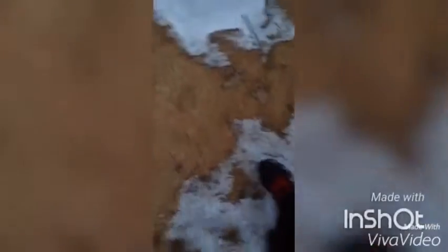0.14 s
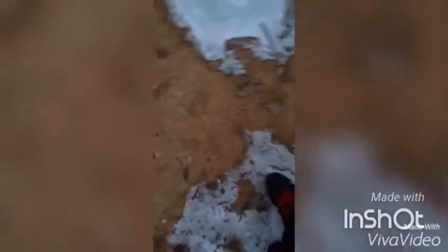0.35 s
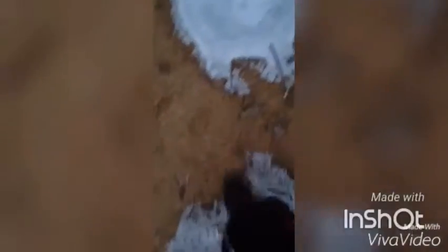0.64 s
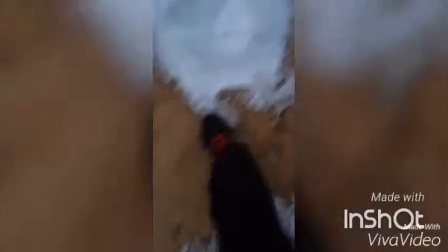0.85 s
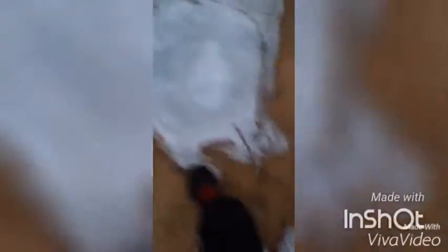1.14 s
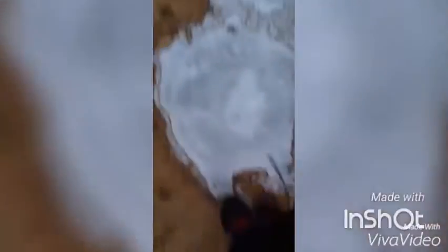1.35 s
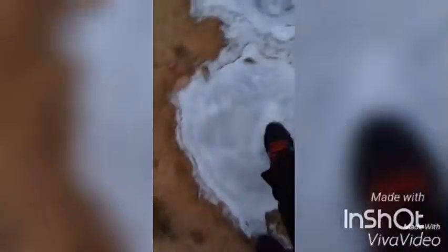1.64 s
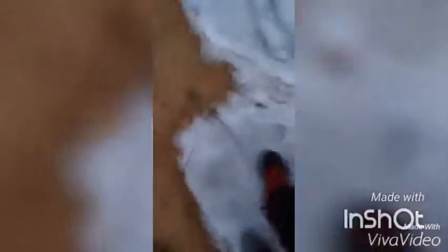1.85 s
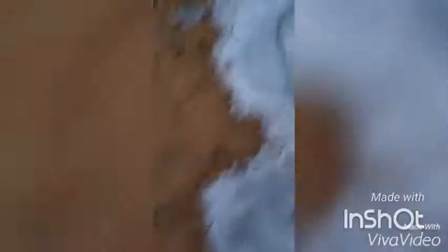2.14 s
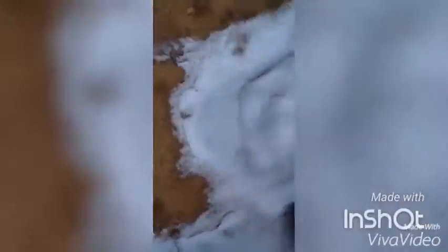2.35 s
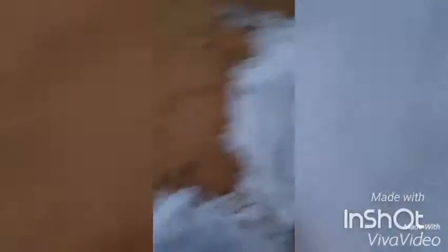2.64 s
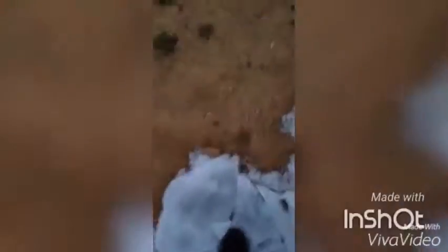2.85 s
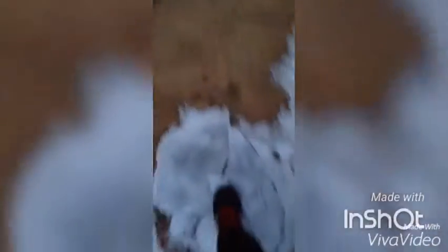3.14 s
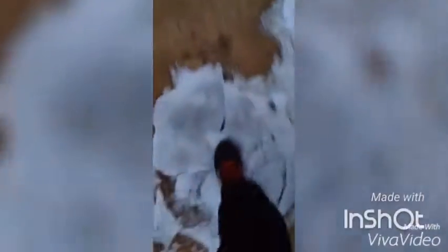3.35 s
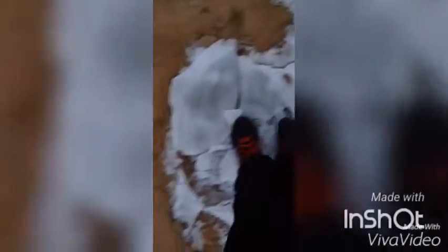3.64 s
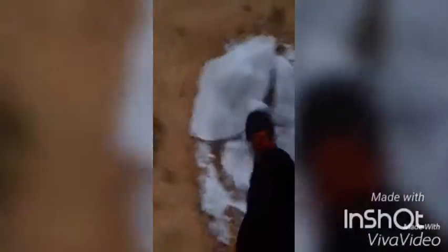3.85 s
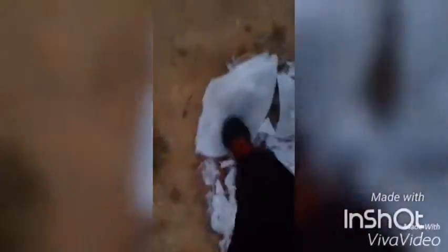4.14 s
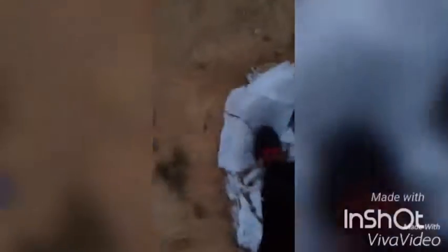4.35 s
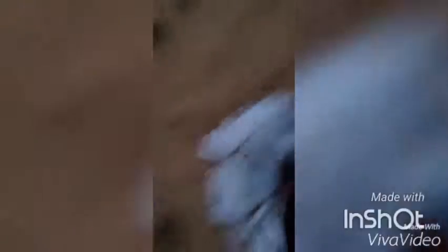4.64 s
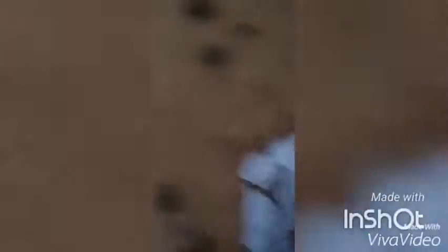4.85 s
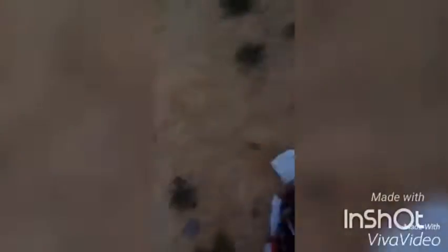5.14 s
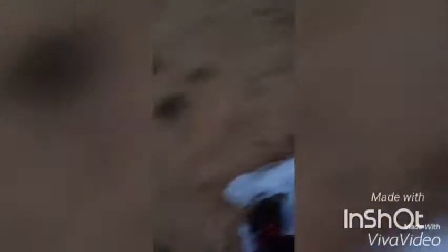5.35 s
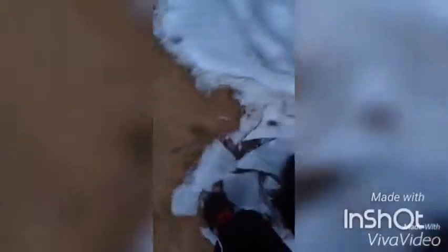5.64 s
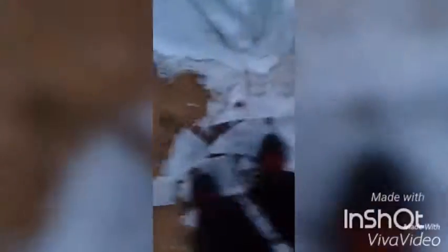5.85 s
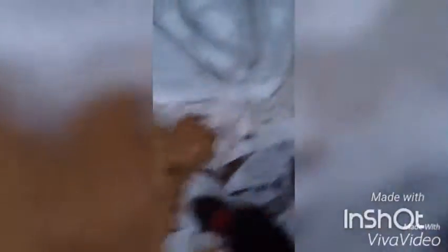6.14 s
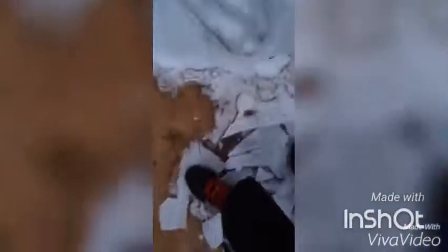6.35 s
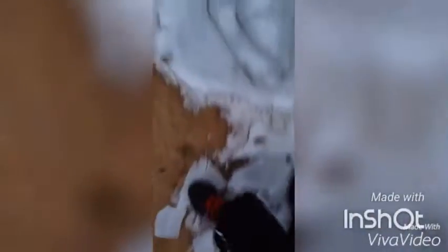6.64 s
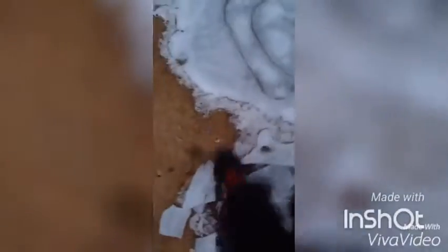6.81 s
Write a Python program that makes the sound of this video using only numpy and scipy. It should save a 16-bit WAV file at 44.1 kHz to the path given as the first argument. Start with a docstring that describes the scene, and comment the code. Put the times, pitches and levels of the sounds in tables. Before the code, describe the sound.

Close to the microphone outdoors, shoes break a brittle crust of ice. A few sharp cracks come in the first second or so, then a short near-quiet gap, then a loud burst of crunching. From there, snaps, glassy splinters and hollow slab knocks follow irregularly almost to the end, with low thuds and rumble from shifting weight. A faint steady hush lies beneath.

```python
"""Brittle ice crust snaps and crunches under shoes, close by, over a faint outdoor hush.
Cracks are bursts of noise that ring a shard and a hollow slab, each as damped modes.
Splinters are filtered noise puffs and ringing shards; broken slabs are modes tapped by sparse clicks.
Low pushes make the thuds, irregular slips the scrapes, and lumpy low noise the rumble.
"""
import sys
import numpy as np
from scipy import signal
from scipy.io import wavfile
from scipy.ndimage import uniform_filter1d

SR = 44100
rng = np.random.default_rng(int(sys.argv[2]) if len(sys.argv) > 2 else 0)


def store_pcm(level_fs):
    """Save levels as 16-bit WAV."""
    pcm = np.round(np.clip(level_fs, -1, 1) * 32767).astype(np.int16)
    wavfile.write(sys.argv[1], SR, np.atleast_2d(pcm).T)


N = 307818  # length in samples

# Spectrum of splintering ice: frequency_hz, relative_level_db
SPLINTER_SPECTRUM = [(590, -30.5), (1000, -11), (1390, -8), (2120, -3.5), (2940, -7), (3510, -1.5),
                     (7730, -6), (9600, -7.5), (9990, -16.5), (10600, -50.5), (13800, -55.5), (22000, -120)]
# The sole grinds down; slab level is the power sum of all plates before their high-pass:
# full_at_s, rise_s, hold_s, splinter_level_db, splinter_and_slab_drift_over_hold_db,
# slab_level_db, slab_tilt_db_per_octave (positive favours small plates)
GRINDS = [(0.157, 0.044, 0.03, -65, 8, -54, -25), (0.207, .02, 0.043, -44, -1.5, -52, 4),
          (0.293, 0.056, .005, -34.5, -1.5, -37, -6), (0.45, 0.024, 0.19, -53.5, -2, -60.5, 0),
          (0.669, 0.14, 0.016, -41.5, 2, -52, 3), (0.845, 0.078, .1, -60, -3, -72, 4),
          (1.075, 0.054, 0.2, -45, -21, -47, 5), (1.373, 0.17, .005, -48.5, 0.5, -50.5, 15),
          (1.497, 0.094, 0.13, -55.5, -12, -61, -3), (1.884, 0.0094, 0.24, -18.5, -1.5, -22, -1),
          (2.271, 0.35, 0.0049, -19, -5.5, -26, -4.5), (2.424, 0.25, .06, -43, 1, -54, -4),
          (2.546, 0.084, 0.013, -23.5, -1, -31.5, 1), (2.587, .05, 0.22, -29.5, 5, -35.5, -1),
          (2.857, 0.11, 0.012, -37.5, 3.5, -43.5, 5), (3.047, 0.064, 0.015, -51, 4.5, -29.5, -22),
          (3.156, 0.11, 0.088, -37.5, 1.5, -40, -2), (3.292, 0.06, .02, -50, -0.5, -58, 3),
          (3.384, 0.075, 0.081, -43, -15, -44, 2), (3.607, 0.17, 0.072, -31, 6, -29, 1.5),
          (3.703, 0.047, 0.0035, -34, -6, -21.5, -8), (3.843, 0.046, 0.0041, -43.5, 0.5, -46, 0),
          (3.921, .03, 0.11, -35.5, 7.5, -32, 6.5), (4.051, 0.051, .16, -27.5, -2.5, -30, 0),
          (4.248, 0.054, 0.11, -42, -4.5, -50, 1), (4.444, 0.11, 0.13, -26.5, -8.5, -31, 6),
          (4.609, 0.17, 0.0044, -26, 2.5, -24.5, 16), (4.686, .05, 0.086, -36.5, -7, -43, 8),
          (4.888, 0.21, 0.0065, -27.5, -3, -30, 5), (4.95, 0.073, 0.11, -44.5, 8.5, -45.5, 9),
          (5.142, 0.11, 0.14, -28, -9, -32, 5), (5.272, 0.022, 0.0022, -12.5, -6, -21, 16),
          (5.391, 0.051, .003, -30.5, -2, -41, 19), (5.536, 0.43, 0.0086, -45.5, 4, -60, 1),
          (5.723, 0.22, 0.052, -50.5, -1, -74, -5), (5.847, 0.12, 0.051, -36.5, 9, -42, -4),
          (6.106, 0.11, 0.12, -36.5, -5.5, -37, 9.5), (6.303, 0.11, 0.088, -37, 9.5, -39.5, 5.5),
          (6.437, 0.12, 0.0046, -25.5, -2, -30.5, 13), (6.643, 0.18, .003, -37, -7.5, -42.5, 11),
          (6.873, 0.24, 0.0055, -40, 1, -36.5, -2.5), (6.975, 0.035, .01, -30.5, -8, -66, 8)]
CONTROL_S = np.arange(0, N + 64, 64) / SR  # coarse time grid for slow levels


def gain_of(db):
    """Decibel law: 20 dB is a factor of ten in amplitude."""
    return 10 ** (np.asarray(db) / 20)


def evened(x):
    """Normalization to unit rms amplitude."""
    return x / np.sqrt(np.mean(x ** 2) + 1e-20)


def peaked(x):
    """Normalization to unit peak amplitude."""
    return x / (abs(x).max() + 1e-20)


def add(mix, start_s, sound):
    """Superposition: a sound adds to the mix in place, cut at its end."""
    part = mix[round(start_s * SR):][:len(sound)]
    part += sound[:len(part)]


def colour(x, spectrum):
    """Minimum-phase filtering: the response is causal, so clicks stay sharp in front."""
    point_hz, point_db = np.transpose(spectrum)
    bin_hz = abs(np.fft.fftfreq(8192, 1 / SR))
    bin_db = np.interp(np.log(bin_hz + 1), np.log(point_hz + 1), point_db)
    log_gain = np.log(gain_of(np.maximum(bin_db, -80)))
    # The Hilbert transform of the log gain supplies the minimum phase.
    response = np.exp(np.conj(signal.hilbert(log_gain)))
    taps = np.fft.ifft(response).real[:4096]
    taps = taps.reshape((1,) * (x.ndim - 1) + (-1,))
    return signal.oaconvolve(x, taps, axes=-1)[..., :x.shape[-1]]


def ring(x, pitch_hz, cycles):
    """Damped resonance: one mode dies by 60 dB in the given number of cycles."""
    pole = np.exp((2j * np.pi - np.log(1000) / cycles) * pitch_hz / SR)
    return signal.lfilter([1], [1, -pole], x + 0j).imag


def train(per_s, spread_db):
    """Random impulse process: sparse clicks of random sign, mostly small, a few large."""
    draw = rng.random((3, N))
    size_db = spread_db * np.minimum(-np.log(draw[1] + 1e-9), 4)
    sign = np.sign(draw[2] - .5)
    return gain_of(size_db) * sign * (draw[0] < per_s / SR)


def thin(x):
    """Radiation cutoff: plates this small push no air below their lowest mode."""
    return signal.sosfilt(signal.butter(3, 300., "high", fs=SR, output="sos"), x)


def summed(levels_db, rest_db):
    """Energy addition: overlapping events add power over a resting level; returns sample gains."""
    power = (gain_of(levels_db) ** 2).sum(axis=0) + gain_of(rest_db) ** 2
    return np.interp(np.arange(N) / SR, CONTROL_S, np.sqrt(power))


def pressure():
    """Exponential envelope: each grind rises, drifts and releases linearly in dB about its full level."""
    rise_db, release_db_per_s = 34, 326.5
    full_at_s, rise_s, hold_s, _, drift_db = np.array(GRINDS).T[:5, :, None]
    before_s = np.maximum(full_at_s - CONTROL_S, 0)
    after_s = np.maximum(CONTROL_S - full_at_s - hold_s, 0)
    held_db = drift_db * np.clip((CONTROL_S - full_at_s) / hold_s, 0, 1)
    return held_db - rise_db * before_s / rise_s - release_db_per_s * after_s


def hush():
    """Stationary broadband noise: steady outdoor air and microphone hiss."""
    # frequency_hz, relative_level_db
    hush_spectrum = [(100, 13.5), (400, -6.5), (1300, -13)]
    level_db = -62  # rms
    return gain_of(level_db) * evened(colour(rng.standard_normal(N), hush_spectrum))


def rumble():
    """Amplitude-modulated low noise from the ground and moving hand swells as the weight shifts."""
    # frequency_hz, relative_level_db
    rumble_spectrum = [(18, -45.5), (30, 0.5), (102, 1), (368, -8.5), (500, -22), (650, -13.5),
                       (1100, -120)]
    # The weight shifts: full_at_s, hold_s, rumble_level_db
    weight_shifts = [(.15, 0.039, -31), (0.3, 0.0087, -47.5), (.6, 0.054, -56), (.937, .01, -58),
                     (1.062, 0.069, -51), (1.38, 0.023, -58), (1.895, 0.0045, -36.5), (2.426, .01, -52),
                     (2.786, 0.028, -43.5), (3.06, 0.028, -28.5), (3.214, 0.06, -33), (3.366, 0.016, -34),
                     (3.527, 0.16, -41.5), (3.704, 0.11, -34), (3.912, 0.0088, -36), (4.15, 0.0071, -27.5),
                     (4.364, 0.23, -39), (4.974, 0.15, -40.5), (5.193, .06, -51), (5.85, 0.056, -45),
                     (6.309, 0.26, -51), (6.91, 0.032, -51)]
    swell_db_per_s, settle_db_per_s, rest_db = 294, 266.5, -59.5
    lumps_db = 3.5 * evened(uniform_filter1d(rng.standard_normal(N), size=700))
    full_at_s, hold_s, full_db = np.array(weight_shifts).T[:, :, None]
    before_s = np.maximum(full_at_s - CONTROL_S, 0)
    after_s = np.maximum(CONTROL_S - full_at_s - hold_s, 0)
    level_db = full_db - swell_db_per_s * before_s - settle_db_per_s * after_s
    lumpy_noise = gain_of(lumps_db) * rng.standard_normal(N)
    return summed(level_db, rest_db) * evened(colour(lumpy_noise, rumble_spectrum))


def splinters(fractures):
    """Many tiny fractures: short noise puffs over a dense blur, with shards in brief modal ringing."""
    rest_db = -62  # between steps
    t = np.arange(600) / SR
    puff_decay = gain_of(-60 * t / 0.015)  # 60 dB in 15 ms
    puffs = evened(signal.oaconvolve(abs(fractures), puff_decay)[:N])
    grit = (puffs + 0.85) * rng.standard_normal(N)
    shard_pitches_hz = np.geomspace(1700., 8500., num=12)
    shards = sum(evened(ring(train(45., 3.8), hz, 30.)) for hz in shard_pitches_hz)
    splinter_db = np.array(GRINDS)[:, 3:4]
    level = summed(splinter_db + pressure(), rest_db)
    return level * evened(colour(grit + .5 * evened(shards), SPLINTER_SPECTRUM))


def slabs(fractures):
    """Impulsive modal excitation: tiny fractures tap broken plates of many sizes, which ring on."""
    rest_db = -75  # each plate, between steps
    pitches_hz = np.geomspace(400., 1500., num=9)
    slab_db, tilt_db = np.array(GRINDS).T[5:, :, None]
    shares = gain_of(tilt_db * np.log2(pitches_hz / 750))
    # In each grind the plates' shares of power sum to one.
    shares_db = 20 * np.log10(shares / np.linalg.norm(shares, axis=1, keepdims=True))
    touched = rng.random((len(pitches_hz), N)) < .3  # a plate feels three fractures in ten
    level_db = slab_db + pressure()
    plates = np.zeros(N)
    for on, hz, share_db in zip(touched, pitches_hz, shares_db.T):
        taps = fractures * on + .5 * train(90., 5.34)
        level = summed(level_db + share_db[:, None], rest_db)
        plates += level * evened(ring(taps, hz, 18.7))
    return thin(plates)


def cracks():
    """Brittle fracture: a gritty snap rings a shard mode and knocks two slab modes."""
    # Peak levels are before the plates' high-pass; a length under 0.5 ms acts as 0.5 ms:
    # start_s, snap_peak_db, shard_pitch_hz, knock_peak_db, slab_pitch_hz, fracture_length_s
    crack_table = [(0.1885, -2, 4000, -8.5, 543, 0.0037), (0.2664, -8, 5440, -27, 660, 0.006),
                   (0.304, -19, 6630, -44, 398, 0.0014), (0.3175, -1, 3100, -18, 540, 0.003),
                   (0.34, -15.5, 3260, -38, 1410, 0.00079), (0.455, -11.5, 5500, -32, 705, 0.00039),
                   (0.4696, -23.5, 3200, -59, 1001, 0.0004), (0.478, -26, 4870, -52, 1442, 0.001),
                   (0.508, -25, 3580, -56, 990, 0.00079), (0.576, -31, 3060, -42, 490, 0.0016),
                   (0.598, -33, 5000, -55, 900, 0.001), (0.62, -19, 3960, -41, 635, 0.0012),
                   (0.6308, -16.5, 4250, -39, 441, 0.0025), (0.661, -21, 3620, -43, 1173, 0.001),
                   (0.6693, -2.5, 1840, -15, 696, 0.0037), (0.7235, -22, 5000, -52, 1216, 0.0028),
                   (0.74, -26.5, 4220, -47, 1442, 0.0039), (0.7487, -25.5, 5300, -55, 1442, 0.0028),
                   (0.7766, -20, 6030, -54, 1431, 0.00046), (0.823, -26, 9300, -68, 721, 0.0025),
                   (0.8262, -26, 6060, -60, 667, 0.0035), (0.8464, -11, 2670, -54, 910, 0.0031),
                   (0.9252, -6.5, 5700, -22, 830, 0.0027), (0.948, -27, 3500, -56, 1033, 0.0056),
                   (1.0093, -20, 5750, -54, 925, 0.00042), (1.039, -22, 5200, -59, 570, 0.0023),
                   (1.0683, -2, 1580, -11, 458, 0.011), (1.139, -22.5, 4370, -28, 1000, 0.00073),
                   (1.2258, -19, 1800, -18.5, 800, 0.0018), (1.885, -1.5, 3600, -7, 460, 0.021),
                   (1.9894, -2, 7100, -4.5, 430, 0.017), (2.116, -20, 5190, -8, 764, 0.016),
                   (2.168, -10.5, 3670, -22, 370, 0.0071), (2.2257, -1, 4480, -14, 750, 0.013),
                   (2.2617, -1, 3930, -8.5, 500, 0.0068), (2.4037, -27, 3520, -28, 460, 0.0053),
                   (2.442, -18.5, 6250, -32, 630, 0.0035), (2.5266, -6.5, 3650, -14, 550, 0.0087),
                   (2.638, -3, 2500, -15.5, 590, 0.0018), (2.671, -7, 2790, -15, 506, 0.009),
                   (2.7098, -8, 3500, -14.5, 476, 0.013), (2.754, -4.5, 5300, -12, 1320, 0.0064),
                   (2.962, -23.5, 1860, -31, 554, 0.021), (3.0026, -13.5, 4100, -19.5, 930, 0.0059),
                   (3.0535, -7, 7050, -20, 383, 0.0041), (3.1202, -16.5, 3680, -30, 1300, 0.00067),
                   (3.1329, -21, 3920, -34, 527, 0.0024), (3.1534, -18, 4200, -28, 555, 0.00069),
                   (3.2, -16.5, 5840, -36, 1200, 0.002), (3.218, -9.5, 5700, -24, 1259, 0.00041),
                   (3.297, -28, 5000, -45, 1200, 0.001), (3.412, -28.5, 1700, -25.5, 810, 0.0013),
                   (3.467, -32, 5000, -39, 1000, 0.001), (3.517, -19.5, 1770, -20, 780, 0.0048),
                   (3.542, -12.5, 1680, -11.5, 650, 0.0051), (3.5875, -10.5, 1560, -12, 720, 0.0085),
                   (3.6164, -3.5, 3550, -9.5, 495, 0.0038), (3.667, -10.5, 5460, -30, 885, 0.021),
                   (3.708, -8.5, 1550, -8, 514, 0.0045), (3.831, -27.5, 3300, -23, 1030, 0.0015),
                   (3.9084, -7, 1770, -4, 734, 0.0032), (3.9124, -8, 3300, -18, 646, 0.014),
                   (3.949, -2.5, 5560, -9.5, 1220, 0.0045), (3.9995, -15, 1690, -10, 690, 0.0014),
                   (4.051, -12.5, 1700, -35, 721, 0.0069), (4.194, -9.5, 4630, -11, 830, 0.0024),
                   (4.204, -0.5, 3800, -7, 850, 0.0074), (4.294, -19, 6700, -46, 1270, 0.0045),
                   (4.346, -14, 7000, -38, 1248, 0.015), (4.375, -17.5, 4020, -42, 656, 0.0035),
                   (4.544, -27, 1700, -14.5, 1300, 0.0074), (4.6028, 2, 2340, -6, 710, 0.0069),
                   (4.6294, -7.5, 3400, -16, 970, 0.0094), (4.734, -2, 3260, -9, 1290, 0.0057),
                   (4.7804, -29, 1700, -21.5, 1190, 0.004), (4.8177, -11.5, 6850, -26, 1060, 0.0028),
                   (4.826, -16, 3790, -22, 1000, 0.012), (4.939, -12, 1670, -13.5, 1270, 0.0043),
                   (4.9807, -16, 9600, -33, 704, 0.0013), (4.985, -10, 7600, -26, 850, 0.0012),
                   (5.014, -20, 1810, -20.5, 810, 0.005), (5.0506, -16.5, 1700, -30, 1140, 0.0063),
                   (5.1304, -4, 5760, -18.5, 890, 0.00037), (5.2, -11.5, 1720, -15, 1270, 0.0035),
                   (5.27, -2.5, 1570, -7.5, 1240, 0.017), (5.29, -28, 1700, -9, 1120, 0.0065),
                   (5.31, -14, 3530, -25, 1120, 0.0036), (5.339, -15, 4320, -40, 930, 0.0064),
                   (5.452, -20, 1720, -33.5, 1340, 0.013), (5.5213, -8.5, 6100, -23.5, 1050, 0.0036),
                   (5.709, -21.5, 5100, -58, 840, 0.00041), (5.723, -13, 5100, -32, 810, 0.00044),
                   (5.8365, -8, 1860, -18.5, 650, 0.0076), (5.864, -14, 5000, -25, 689, 0.0025),
                   (5.8826, -10, 3440, -15.5, 666, 0.0013), (5.901, -10, 5190, -9.5, 680, 0.0056),
                   (5.9096, -6.5, 1750, -13, 730, 0.015), (5.927, -4.5, 4650, -9.5, 990, 0.0037),
                   (6.293, -16.5, 7400, -22, 570, 0.0029), (6.312, -12, 6940, -25.5, 517, 0.0081),
                   (6.419, 1, 3330, -10, 1260, 0.0091), (6.6231, -6, 5470, -9.5, 1095, 0.0027),
                   (6.767, -26, 1870, -17.5, 800, 0.0027), (6.792, -21.5, 2050, -16.5, 850, 0.0037),
                   (6.829, -46, 1950, -17.5, 775, 0.0033), (6.8593, -17, 3620, -18.5, 665, 0.0038),
                   (6.874, -19.5, 1790, -19, 730, 0.0074), (6.9105, -48, 1710, -17.5, 874, 0.002)]
    t, snaps, knocks = np.arange(2500) / SR, np.zeros(N), np.zeros(N)
    tears, jumps = rng.standard_normal((len(crack_table), 2, len(t))).transpose(1, 0, 2)
    # The fracture advances in jumps a fraction of a millisecond long.
    jumps_db = 5.77 * evened(uniform_filter1d(jumps, size=16, axis=1))
    tears = tears * gain_of(jumps_db)
    for tear, (start_s, snap_db, shard_hz, knock_db, slab_hz, length_s) in zip(tears, crack_table):
        u = t / max(length_s, .0005)
        burst = tear * (1 - np.exp(-u / 0.14)) * np.exp(-u / 0.8 - u ** 2 / 5.3)
        shard = evened(ring(burst, shard_hz, 11.))
        snap = evened(colour(burst, SPLINTER_SPECTRUM)) + .8 * shard
        add(snaps, start_s, gain_of(snap_db) * peaked(snap))
        upper_mode = gain_of(-8.) * ring(burst, 1.7 * slab_hz, 7.)
        knock = ring(burst, slab_hz, 10.5) + upper_mode
        # The slab follows the snap by 0.55 ms.
        add(knocks, start_s + 0.00055, gain_of(knock_db) * peaked(knock))
    return thin(snaps + knocks)


def thuds():
    """Impulse response of a heavily damped low mode: the sole drops through the crust."""
    # moment_s, peak_level_db, pitch_hz
    thud_table = [(0.323, -17.5, 259), (0.676, -23, 250), (1.078, -14.5, 250), (1.893, -14, 150),
                  (1.917, -16.5, 190), (1.949, -14.5, 277), (2.133, -23, 327), (2.421, -27, 316),
                  (2.757, -28, 247), (3.027, -18, 252), (3.062, -21, 144), (3.08, -23, 104),
                  (3.274, -18, 132), (3.396, -26, 200), (3.464, -25.5, 142), (3.738, -20, 154),
                  (4.102, -23, 145), (4.137, -19.5, 172), (4.16, -17, 235), (4.377, -25, 126),
                  (4.419, -26, 262), (4.446, -21, 182), (4.51, -24, 127), (5.073, -23.5, 101),
                  (6.423, -22.5, 308), (6.878, -21, 320)]
    out, after = np.zeros(N), np.zeros(3000)
    for moment_s, peak_db, hz in thud_table:
        push = np.concatenate([np.hanning(round(.6 * SR / hz) + 2), after])
        thud = peaked(ring(np.gradient(push), hz, 4.8))
        add(out, moment_s - 0.73 / hz, gain_of(peak_db) * thud)  # starts 0.73 cycle early
    return out


def scrapes():
    """Stick-slip excitation: uneven slips of a shard sliding under the sole drive its one mode."""
    # start_s, length_s, pitch_hz, level_db (rms before the fade in and out)
    scrape_table = [(3.821, 0.06, 825, -38.5), (5.344, 0.22, 1430, -50), (5.709, 0.058, 3280, -45)]
    out, slips = np.zeros(N), train(500., 2.6)
    for start_s, length_s, hz, level_db in scrape_table:
        stroke = slips[round(start_s * SR):][:round(length_s * SR)]
        fade = np.hanning(len(stroke)) ** .5
        add(out, start_s, gain_of(level_db) * evened(ring(stroke, hz, 18.)) * fade)
    return out


def scene():
    """Linear superposition of all sources; splinters and slabs share the same tiny fractures."""
    fractures = train(280., 3.06)
    underfoot = splinters(fractures) + slabs(fractures)
    return (cracks() + underfoot + scrapes() + thuds() + rumble() + hush())[None]


def record(dry):
    """Band limiting and saturation: the microphone loses deep bass, peaks clip, then treble is cut."""
    band_edge_hz = 10650
    light = signal.sosfilt(signal.butter(2, 60., "high", fs=SR, output="sos"), dry)
    clipped = np.clip(light, -.92, .92)
    low_pass = signal.firwin(301, band_edge_hz, window=("kaiser", 9), fs=SR)
    return signal.oaconvolve(clipped, low_pass[None], "same")


dry = scene()
out = record(dry)
store_pcm(out)
```